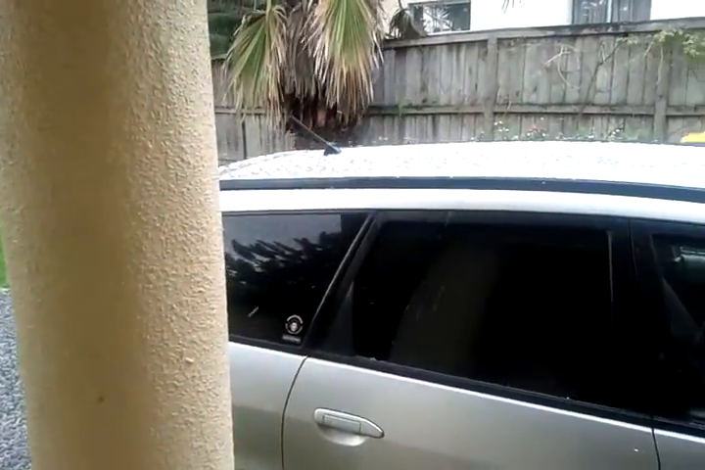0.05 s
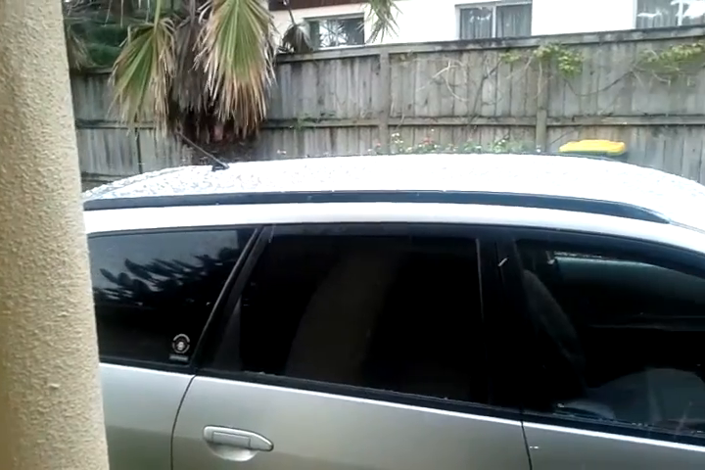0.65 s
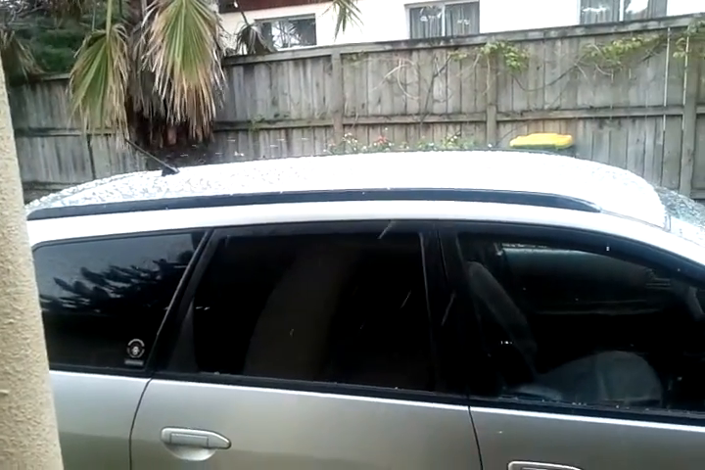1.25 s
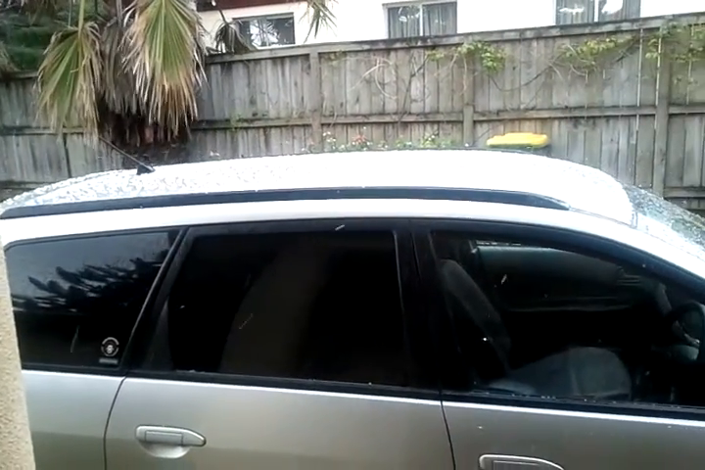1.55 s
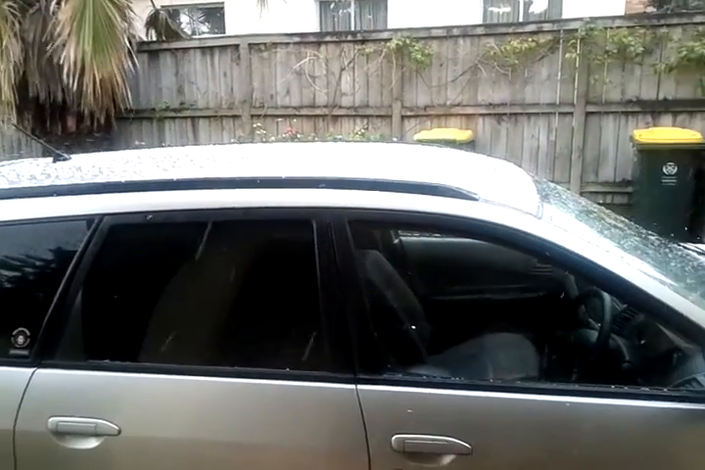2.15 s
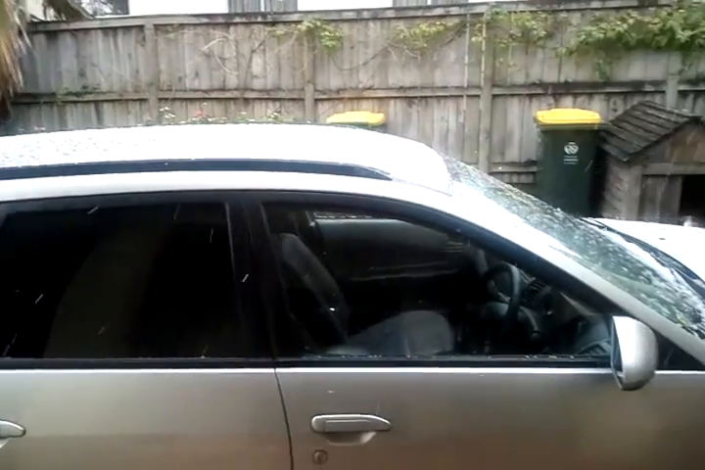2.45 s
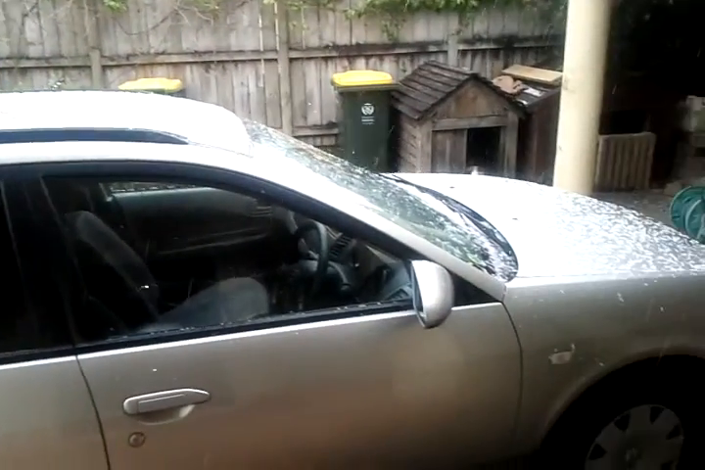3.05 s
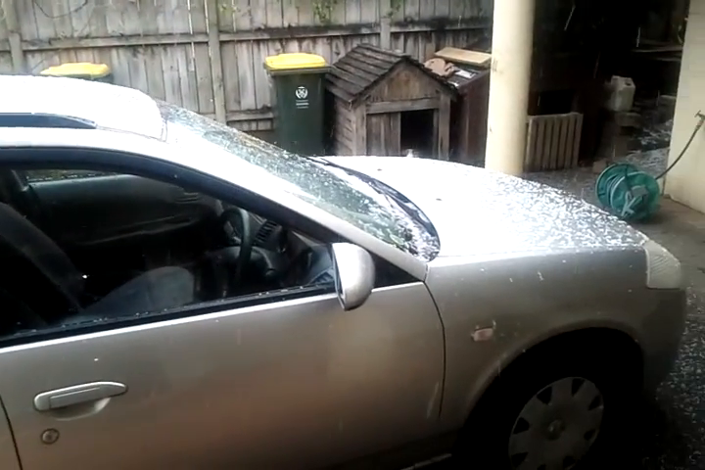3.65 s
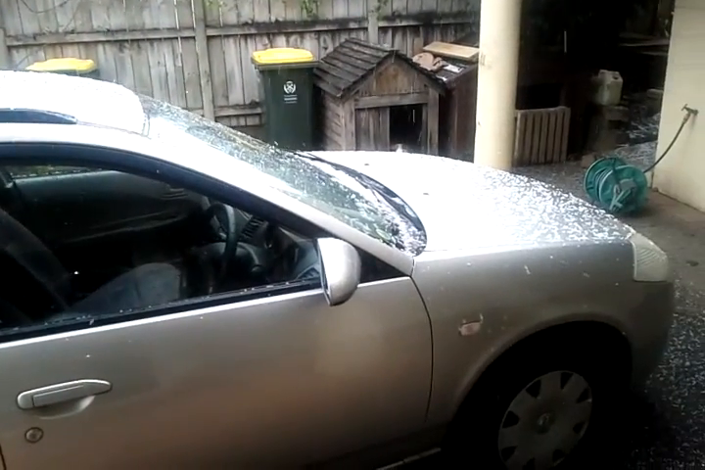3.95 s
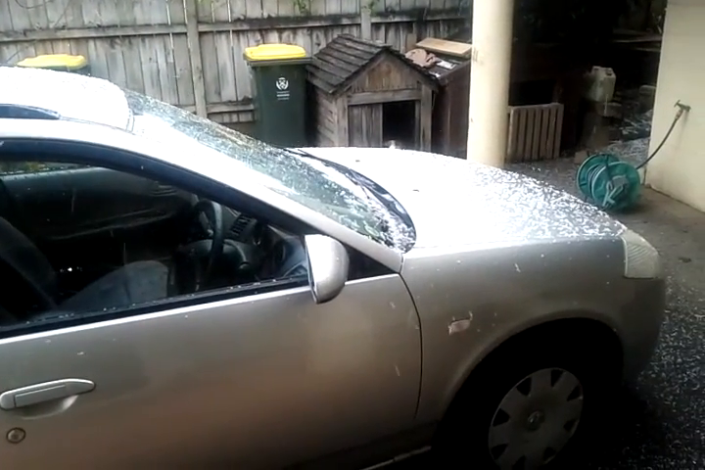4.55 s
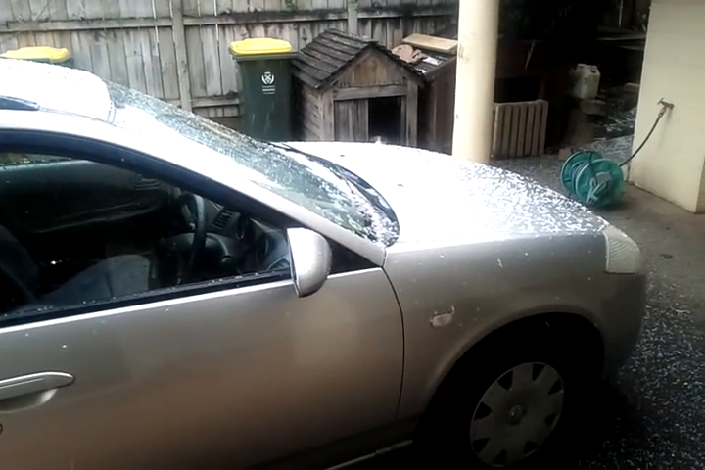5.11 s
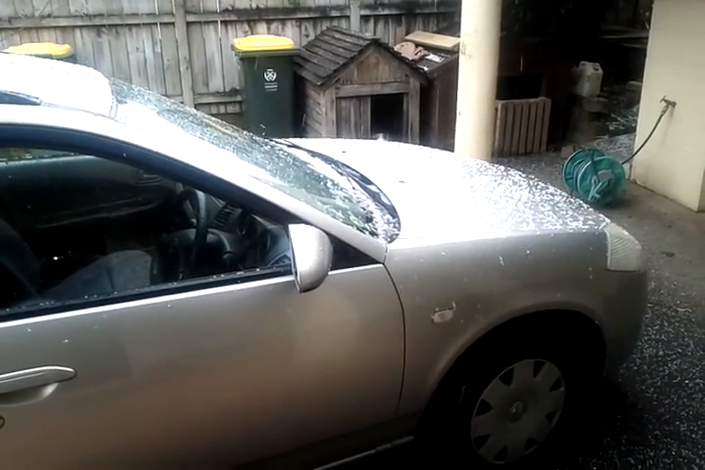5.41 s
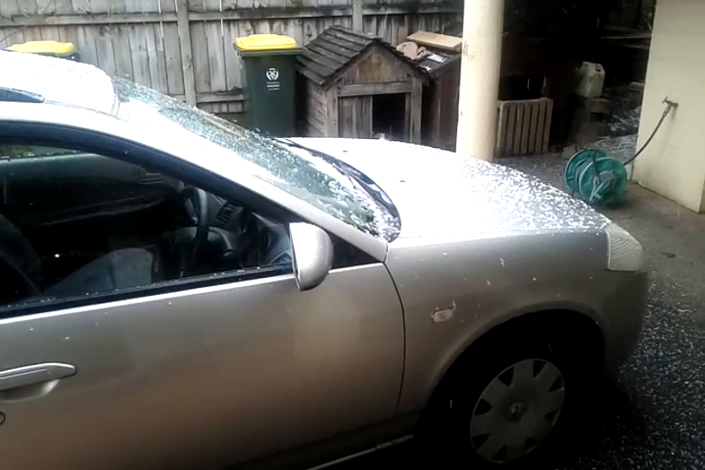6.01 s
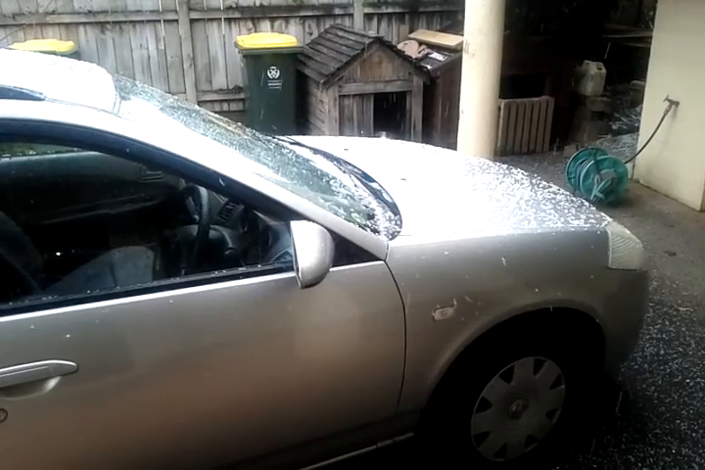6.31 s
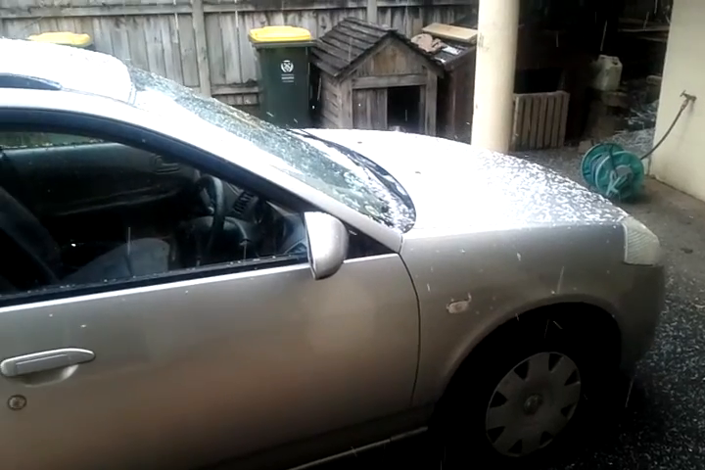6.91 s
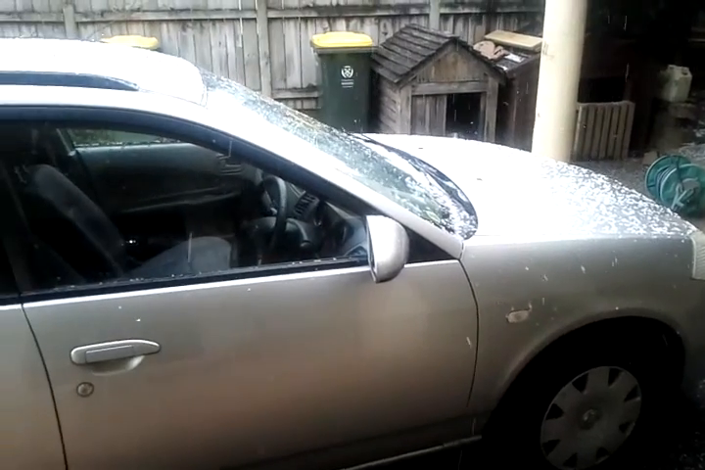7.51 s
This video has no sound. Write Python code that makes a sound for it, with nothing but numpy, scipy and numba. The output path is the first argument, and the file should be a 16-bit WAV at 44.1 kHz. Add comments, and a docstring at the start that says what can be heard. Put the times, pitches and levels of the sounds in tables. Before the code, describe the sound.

Small hail falls thickly on a parked car and paved driveway, hissing and pattering, with a few sharp cracks close by.

```python
"""Under a porch, small hail falls thickly on a paved driveway and a parked car, heard in mono by a camera.
Far stones blur into hiss, the car's panels patter and knock, and near stones tick; the shower eases
and returns. Air buffets the microphone early on. A few bigger stones crack and shatter close by,
and one stays whole and pings."""
import sys
import numpy as np
from scipy import signal
from scipy.fft import rfft, irfft, next_fast_len
from scipy.io import wavfile
from scipy.ndimage import map_coordinates
from numba import njit

SR = 44100
rng = np.random.default_rng(int(sys.argv[2]) if len(sys.argv) > 2 else 0)


def to_wav(sig):
    """Store sig (one row per channel, or 1-D mono) as 16-bit WAV at the path in sys.argv[1].

    Samples outside -1..1 are clipped; the rate is SR.
    """
    pcm = np.clip(np.atleast_2d(sig), -1, 1) * 32767
    pcm = np.round(pcm).astype(np.int16)
    wavfile.write(sys.argv[1], SR, pcm.T)  # frames by channels


N = 342654
TIME_S = np.arange(N) / SR


def undb(db):
    """Decibels to gain."""
    return 10 ** (np.asarray(db) / 20)


def unit(x):
    """Scale to rms 1."""
    return x / np.sqrt(np.mean(x ** 2))


def colour(x, points):
    """Minimum-phase filter through (Hz, dB) points, mean power gain 1."""
    hz, db = np.transpose(points)
    size = next_fast_len(N + SR // 10, real=True)
    bins_hz = np.fft.rfftfreq(size, 1 / SR)
    gain = unit(undb(np.interp(np.log(bins_hz + 1), np.log(hz), db)))
    cepstrum = irfft(np.log(gain), size)
    cepstrum[1:size // 2] *= 2
    cepstrum[size // 2 + 1:] = 0
    return irfft(rfft(x, size) * np.exp(rfft(cepstrum)), size)[:N]


def wander(rate_hz):
    """Smooth random drift, spread near 1."""
    steps = rng.standard_normal(N // 100)
    return map_coordinates(steps, [TIME_S * rate_hz], order=2, mode="wrap")


@njit
def ring(starts_s, hz, t60_s, size):
    """Each impact starts one damped vibration."""
    out = np.zeros(N)
    for k in range(len(starts_s)):
        pole = np.exp((2j * np.pi * hz[k] - np.log(1000) / t60_s[k]) / SR)
        phasor = size[k] + 0j
        first = int(starts_s[k] * SR)
        for i in range(first, min(N, first + int(t60_s[k] * SR))):
            out[i] += phasor.imag
            phasor *= pole
    return out


def impacts(count, lo_hz, hi_hz, t60_s, spread_db):
    """Stones land at random, most small or far, a few large; each rings three pitches of its own."""
    chance = rng.random((count, 6))
    starts_s = chance[:, 0] * N / SR
    size = undb(-spread_db * np.log(np.maximum(chance[:, 1], 0.03)))
    decays_s = t60_s * 2 ** (2 * chance[:, 2] - 1)
    pitches_hz = lo_hz + (hi_hz - lo_hz) * chance[:, 3:].T
    return unit(sum((-1) ** k * ring(starts_s, hz, decays_s, size) for k, hz in enumerate(pitches_hz)))


def strike(hits, modes):
    """Every hit rings the same modes, varying a little with the spot it lands on."""
    hz, mode_db, t60_s = np.transpose(modes)
    starts_s, hit_db = np.transpose(hits)
    chance = rng.standard_normal((len(hits), 2, len(hz)))
    pitches_hz = hz * (1 + 0.02 * chance[:, 0])
    polarity = (-1) ** np.arange(len(hz))
    size = polarity * undb(hit_db[:, None] + mode_db + 1.5 * chance[:, 1])
    return ring(np.repeat(starts_s, len(hz)), pitches_hz.ravel(), np.tile(t60_s, len(hits)), size.ravel())


def yard_reverb(x, t60_s, wet_db):
    """Porch, wall and fence scatter each impact into a short tail."""
    t = TIME_S[:SR // 2]
    tail = rng.standard_normal(len(t)) * undb(-60 * t / t60_s) * (t > 0.004)
    return x + undb(wet_db) * signal.fftconvolve(x, tail / np.linalg.norm(tail))[:N]


# Ice on paving and glass. Each row: frequency in Hz, relative gain in dB.
ICE_SPECTRUM = [(900, -23), (2000, -5), (2500, -5), (3050, -4.5), (3600, -2), (4280, 0), (5150, -3.5),
                (5900, -2.5), (6750, -0.5), (7250, -4), (7700, -10), (8400, -19), (8900, -36),
                (9200, -55.5)]


def paving_hiss():
    """Countless far stones blur into a hiss with slight flurries."""
    grains = impacts(count=70000, lo_hz=620, hi_hz=9370, t60_s=0.0049, spread_db=2)
    blur = undb(4.5) * rng.standard_normal(N)
    flurry_db = 0.45 * wander(30) + 0.25 * wander(10)
    return unit(colour(grains + blur, ICE_SPECTRUM)) * undb(flurry_db)


# Roof, bonnet and doors. Each row: frequency in Hz, relative gain in dB.
PANEL_SPECTRUM = [(20, -11), (60, -13), (130, -10.5), (390, -8.5), (520, -4.5), (660, -2.5), (860, -2.5),
                  (1080, -1), (1650, 0), (1850, -.5), (2040, 0.3), (2230, -3.5), (2550, -7), (3200, -17),
                  (6000, -38)]


def car_patter():
    """Wet sheet metal and glass answer each stone with a short, dull ring."""
    patter = impacts(count=36000, lo_hz=23.9, hi_hz=3974, t60_s=0.019, spread_db=2)
    blur = undb(2) * rng.standard_normal(N)
    return unit(colour(patter + blur, PANEL_SPECTRUM)) * undb(0.24 * wander(10))


# Ice striking close by. Each row: frequency in Hz, relative gain in dB.
CRACK_SPECTRUM = [(150, -19.5), (600, -12.5), (1800, -1.5), (2900, -7.5), (4400, 0), (5400, 1), (6900, 2),
                  (7800, -0.5), (8900, -23.5), (10000, -45.5)]


def near_ticks():
    """Stones landing near the porch stay separate and keep more treble."""
    ticks = impacts(count=3200, lo_hz=2520, hi_hz=9550, t60_s=0.0033, spread_db=0.5)
    scattered = yard_reverb(colour(ticks, CRACK_SPECTRUM), t60_s=0.089, wet_db=-9.5)
    return unit(scattered) * undb(2 * wander(40))


# Puffs of air. Each row: peak time in seconds, level in dB.
AIR_PUFFS = [(0.139, -26), (.265, -37.5), (0.935, -44), (1.555, -34), (1.705, -37), (1.88, -37.5),
             (2.008, -30.5)]
# Their rumble. Each row: frequency in Hz, relative gain in dB.
RUMBLE_SPECTRUM = [(25, -25), (55, -10), (90, -1.5), (140, 0), (230, -2.5), (330, -5.5), (500, -16),
                   (1000, -52.5)]


def air_buffets():
    """Eddies cross the microphone port; pressure goes with speed squared, so strong ones pass sooner."""
    width_at_0db_s = 0.0041
    pressure = np.zeros(N)
    for peak_s, db in AIR_PUFFS:
        width_s = width_at_0db_s / np.sqrt(undb(db))
        pressure += undb(db) * np.exp(-0.5 * ((TIME_S - peak_s) / width_s) ** 2)
    return pressure * unit(colour(rng.standard_normal(N), RUMBLE_SPECTRUM))


# Hits on bonnet and roof. Each row: start in seconds, relative level in dB.
PANEL_HITS = [(0.9868, -12), (2.6299, -16), (3.1939, -14), (4.915, -17), (5.6533, -21), (5.98, -21),
              (6.2748, -18)]
# Sheet metal modes. Each row: frequency in Hz, relative level in dB, t60 in seconds.
PANEL_MODES = [(1040, -2.5, 0.078), (1166, -13, 0.049), (1378, -6, 0.11), (1570, -6, 0.044),
               (1730, 0.5, 0.029), (2044, -1, 0.073)]


def car_knocks():
    """Single stones ring the sheet metal with a dull knock."""
    return undb(-9) * strike(PANEL_HITS, PANEL_MODES)


# Stones that shatter. Each row: start in seconds, relative level in dB, spray t60 in seconds.
SHATTERS = [(1.3164, -7.5, .07), (3.026, -8, 0.13), (3.716, -10, .05), (4.4354, -12.5, .06),
            (4.539, -13.5, .05), (4.9234, -13, 0.077), (5.3405, -11, .055), (5.652, -7.5, 0.085),
            (5.674, -13, .05), (5.9934, -16.5, 0.22), (7.0194, -14.5, .12), (7.5594, -12, .08)]


def shattering_stones():
    """A bigger stone cracks hard, then leaves a dying spray of chips and bounces."""
    crack_db, spray_db = -5, -13
    out = np.zeros(N)
    chips = impacts(count=40000, lo_hz=300, hi_hz=8400, t60_s=0.0013, spread_db=4)
    for start_s, db, t60_s in SHATTERS:
        first = int(start_s * SR)
        t = TIME_S[:min(SR // 4, N - first)]
        span = slice(first, first + len(t))
        out[span] += undb(db + spray_db - 60 * t / t60_s) * chips[span]
        out[first] += undb(db + crack_db)
    return yard_reverb(colour(out, CRACK_SPECTRUM), t60_s=0.2, wet_db=-12)


# A stone that stays whole. Each row: start in seconds, relative level in dB.
PING_HITS = [(5.7972, -17.5)]
# Its ring. Each row: frequency in Hz, relative level in dB, t60 in seconds.
PING_RING_MODES = [(6342, 3.5, .034), (6794, 2.5, 0.037), (7000, -8, .025)]


def stone_ping():
    """A whole stone bounces off something small and hard: a crack and a high ring."""
    crack_db = 19.5
    impulse = np.zeros(N)
    for start_s, db in PING_HITS:
        impulse[int(start_s * SR)] += undb(db + crack_db)
    ping = strike(PING_HITS, PING_RING_MODES)
    return ping + yard_reverb(colour(impulse, CRACK_SPECTRUM), t60_s=0.2, wet_db=-12)


# Shower strength, easing and returning. Each row: time in seconds, level in dB.
SHOWER_LEVEL = [(0.02, -19.5), (0.98, -19), (2.06, -20.5), (2.59, -22.5), (3.06, -22.5), (5.21, -26),
                (5.62, -26), (6.67, -23), (7.72, -22.5)]


def scene():
    """The shower drives paving and car together; near ticks follow half its swing, so stand out in the lull."""
    paving_db, car_db, ticks_db = -2, -6, -24.5
    shower_db = np.interp(TIME_S, *np.transpose(SHOWER_LEVEL))
    hiss = undb(shower_db + paving_db) * paving_hiss()
    patter = undb(shower_db + car_db) * car_patter()
    ticks = undb(0.51 * shower_db + ticks_db) * near_ticks()
    mono = hiss + patter + ticks + air_buffets() + car_knocks() + shattering_stones() + stone_ping()
    return np.array([mono, mono])


def record(dry):
    """The deepest bass is removed, and the camera cuts the top steeply."""
    low_hz, top_hz = 10, 9050
    highpass = signal.butter(1, low_hz, "high", fs=SR, output="sos")
    lowpass = signal.ellip(12, 0.2, 80, top_hz, fs=SR, output="sos")
    return signal.sosfilt(lowpass, signal.sosfilt(highpass, dry))


dry = scene()
out = record(dry)
to_wav(out)
```